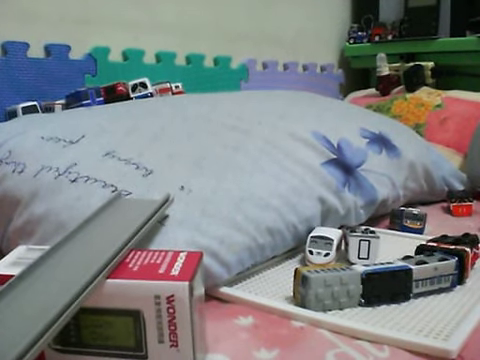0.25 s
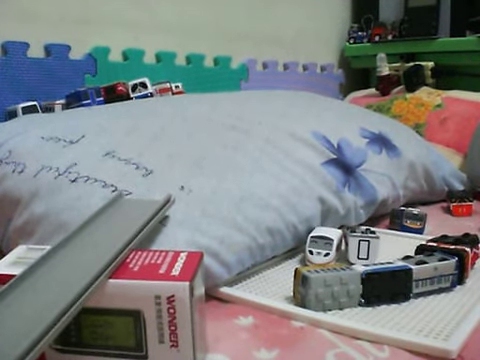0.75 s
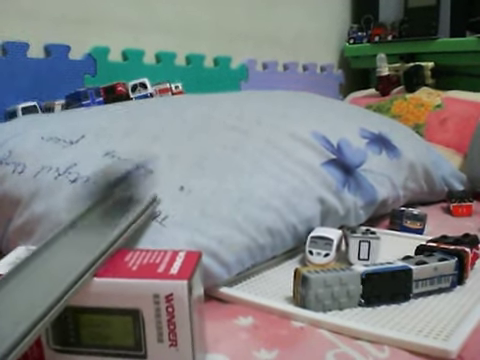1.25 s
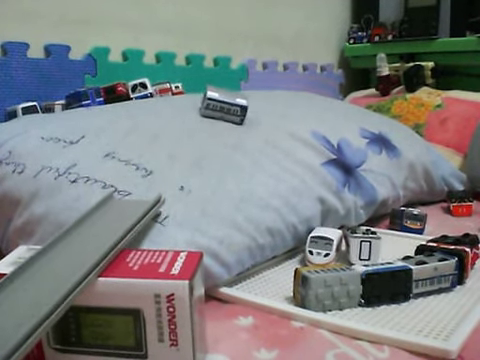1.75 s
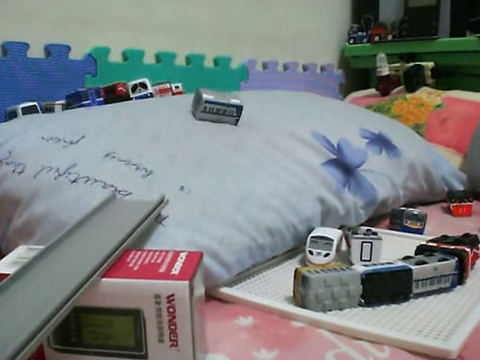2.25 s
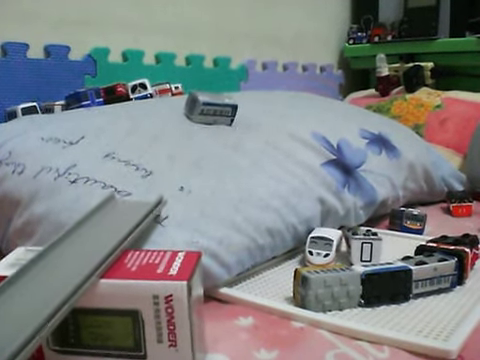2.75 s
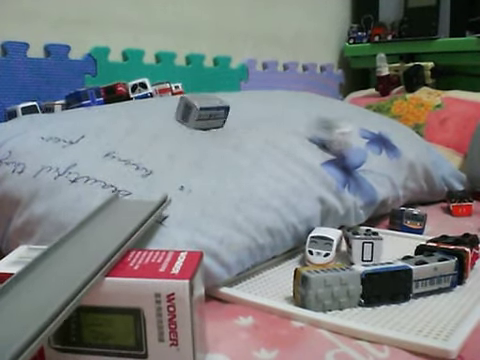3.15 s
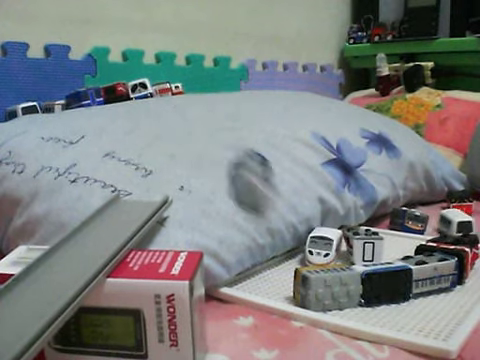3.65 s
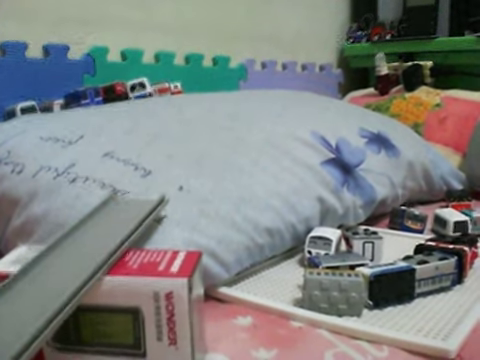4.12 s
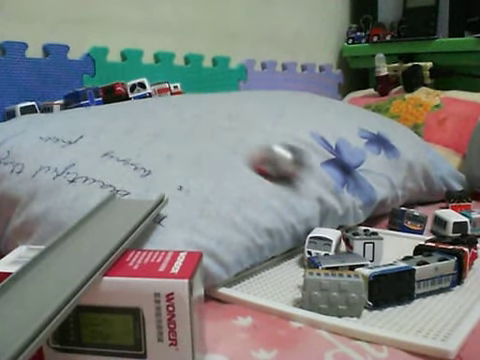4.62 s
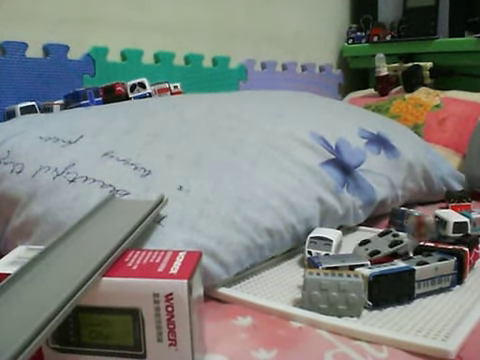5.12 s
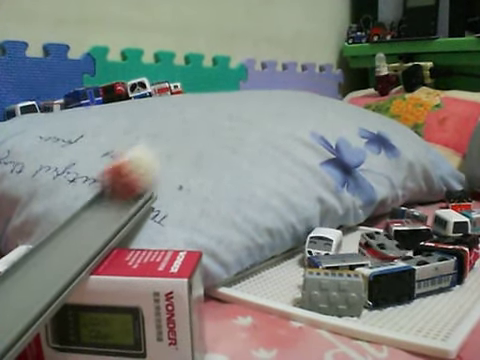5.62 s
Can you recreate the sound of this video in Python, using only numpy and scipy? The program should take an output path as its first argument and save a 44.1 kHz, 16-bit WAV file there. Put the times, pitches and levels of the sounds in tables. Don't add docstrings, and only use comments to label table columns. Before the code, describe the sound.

Plastic gears chatter close up: winding first, then a slower idle, then a freed car whirring and running down tick by tick. Hard clacks and soft thuds mark its fall. Two more cars race up the hollow ramp with quick whines, scuffs and dense steady buzzing, the second knocking into toys. Bedroom with faint fan drone and low rumble; short room tail, loudest clicks clipped on a cheap microphone.

```python
import sys
import numpy as np
from scipy import signal
from scipy.fft import rfft, irfft
from scipy.io import wavfile
from scipy.ndimage import uniform_filter1d, map_coordinates

SR = 44100
rng = np.random.default_rng(int(sys.argv[2]) if len(sys.argv) > 2 else 0)


def digitize_waveform(pressure):
    field = np.atleast_2d(pressure).T
    bounded = np.clip(field, -1, 1)
    quanta = np.round(bounded * 32767).astype(np.int16)
    wavfile.write(sys.argv[1], SR, quanta)


def how_loud(loudness_db):
    steps = np.asarray(loudness_db, float) / 20
    return 10 ** steps


N = 259308
TIME = np.arange(N) / SR


def level(x, db):
    return x * how_loud(db) / np.sqrt(np.mean(x ** 2))


def ring(x, hz, width_hz):
    return signal.lfilter(*signal.iirpeak(hz, hz / width_hz, fs=SR), x)


def body(x, modes):
    total = np.zeros(N)
    for k, (hz, width_hz, db) in enumerate(modes):
        total += (-1) ** k * how_loud(db) * ring(x, hz, width_hz)
    return level(total, 0)


def band(x, lo_hz, hi_hz):
    sos = signal.butter(2, [lo_hz, hi_hz], "band", fs=SR, output="sos")
    return level(signal.sosfilt(sos, x), 0)


def decay(t, t60):
    return np.exp(-np.log(1000) * t / t60)


def glide(rows):
    return np.interp(TIME, *np.array(rows)[:, :2].T)


def track(table, column, fade=.008):
    rows = np.array(table)
    s = np.r_[rows[0, 0] - fade, rows[:, 0], rows[-1, 0] + fade]
    return np.interp(TIME, s, np.r_[0, how_loud(rows[:, column]), 0])


def walk(rate):
    k = int(SR / rate)
    return 1.245 * uniform_filter1d(np.repeat(rng.standard_normal(N // k + 1), k)[:N], k)


def chatter(per_s, spread_db):
    hit = rng.random(N) < per_s / SR
    return hit * rng.standard_normal(N) * how_loud(spread_db * rng.exponential(size=N))


def airy(curve, start_db, db_per_s):
    return [(s, db, db + start_db + db_per_s * (s - curve[0][0])) for s, db in curve]


def gears(tables, shell, spin_hz, sag, tick_db, tick_ms, rough_db, treble_hz, treble_width_hz,
          turns=None, panels=()):
    if turns is None:
        turns = np.cumsum(spin_hz * (1 + 0.0143 * walk(40))) / SR
    else:
        turns = turns + 0.049 * walk(40)
    sizes = how_loud(tick_db + 1.3 * np.tanh(rng.standard_normal(2000)))
    size = sizes[(2 * turns).astype(int) % 2000]
    size = size * np.where(turns % 1 < .5, 1, .3)
    since_tick = (turns % .5) / spin_hz
    ticks = size * np.exp(-since_tick / (tick_ms / 1000))
    tight = 1 + uniform_filter1d(ticks, size=int(0.002 * SR))
    teeth = chatter(24000, .7) * tight * how_loud(rough_db * walk(110))

    place = np.cumsum(sag * (1 + .011 * walk(7)))
    at = np.arange(N)
    early = np.interp(np.interp(at, place, at), at, teeth)

    def sagged(v):
        return level(map_coordinates(v, [place], order=3, mode="mirror"), 0)

    low = sagged(body(early, shell))
    edge = level(ring(teeth, treble_hz, treble_width_hz), 0)
    high = level(edge + 1.07 * band(teeth, 6530, 9980), 0)
    out = sum(low * track(t, column=1) + high * track(t, column=2) for t in tables)
    loose = early * np.sign(rng.standard_normal(N))
    for hz, width_hz, curve in panels:
        out = out + sagged(ring(loose, hz, width_hz)) * track(curve, column=1)
    return out


def whines(tables, waver, waver_db):
    out = 0
    for rows in tables:
        phase = 2 * np.pi * np.cumsum(glide(rows) * (1 + waver * walk(300))) / SR
        tone = track(rows, column=2) * np.sin(phase) + track(rows, column=3) * np.sin(2 * phase)
        out = out + np.sqrt(2) * tone * how_loud(waver_db * walk(150))
    return out


# (f/Hz, level/dB per Hz)
ROOM = [(15, -44), (25, -2.5), (198, -3.5), (286, -5), (384, -4), (730, -4), (1030, -2.5), (1290, -0.5),
        (2000, -6.5), (2600, -47), (4400, -120)]
# (t/s, level/dB)
ROOM_SWELL = [(0.0, -41), (0.5, -44), (0.8, -49), (1.2, -42.5), (2.73, -46.5), (3.68, -50.5), (3.9, -52),
              (4.24, -36.5), (4.49, -43.5), (5.88, -41)]
# (t/s, level/dB)
FAN = [(0.0, -48.5), (2.73, -53.5), (4.1, -68), (4.5, -54), (5.88, -63)]


def room_tone():
    hz = np.maximum(np.arange(N // 2 + 1) * SR / N, 1)
    room_hz, room_db = np.array(ROOM).T
    shape = how_loud(np.interp(np.log(hz), np.log(room_hz), room_db))
    rumble = level(irfft(rfft(rng.standard_normal(N)) * shape, N), 2.56)
    drone = ring(ring(rng.standard_normal(N), 296, 30), 296, 30)
    return rumble * track(ROOM_SWELL, column=1) + level(drone, 0) * track(FAN, column=1)


# (t/s, level/dB)
WINDING = [(0.0, -22.5), (0.104, -21), (0.39, -20), (0.472, -21), (0.54, -25.5), (0.583, -27.5),
           (0.592, -40)]
# (f/Hz, width/Hz, level/dB)
WINDING_SHELL = [(1654, 160, -6), (2100, 600, -28), (2650, 180, -1), (3500, 370, -14), (3920, 360, 5.5),
                 (5130, 170, -16), (6240, 2800, -14), (3500, 3400, -4)]
# (t/s, pitch factor)
WINDING_SAG = [(0, .97), (.1, 1.0), (.2, .97), (.35, 1.02), (.6, 1.03)]
# (f/Hz, width/Hz, [(t/s, level/dB)])
WINDING_PANELS = [(1640, 90, [(0.0, -42), (0.12, -38), (0.25, -33), (0.38, -30), (0.45, -33), (0.55, -39)])]
# (t/s, length/s, dip/dB)
SLIPS = [
    (0.134, .045, -9.5),
    (0.397, 0.02, -13),
    (0.44, .018, -6),
]


def winding_car():
    dip_db = np.zeros(N)
    for s, length, db in SLIPS:
        dip_db += db * np.clip(1 - np.abs(TIME - s) / (length / 2), 0, 1) ** .5
    train = gears([airy(WINDING, start_db=-3.5, db_per_s=-11)], WINDING_SHELL, np.full(N, 64.0),
                  glide(WINDING_SAG), tick_db=0, tick_ms=0.47, rough_db=0.91,
                  treble_hz=10000, treble_width_hz=1800, panels=WINDING_PANELS)
    return how_loud(dip_db) * train


# (t/s, level/dB)
IDLER = [
    [(0.0, -39), (0.284, -29), (0.746, -34), (1.1, -32.5)],
    [(2.6, -45), (2.78, -28.5), (2.94, -28.5), (2.95, -36.5), (3.79, -35), (3.8, -31), (3.93, -31),
     (3.94, -34.5), (4.1, -32.5)],
]
# (f/Hz, width/Hz, level/dB)
IDLER_SHELL = [(1400, 210, 11), (2400, 360, 11.5), (3500, 920, 16.6), (5300, 300, 3.8), (6600, 120, 13.5),
               (3700, 6300, 8.1)]
# (f/Hz, width/Hz, [(t/s, level/dB)])
IDLER_PANELS = [(2545, 240, [(3.5, -50), (3.58, -40), (3.79, -46)])]


def idling_car():
    runs = [airy(run, start_db=0.26, db_per_s=0.14) for run in IDLER]
    return gears(runs, IDLER_SHELL, np.full(N, 22.0), np.ones(N), tick_db=0.66, tick_ms=2.0,
                 rough_db=1.73, treble_hz=8800, treble_width_hz=1600, panels=IDLER_PANELS)


# (t/s, tooth rate f/Hz, level/dB)
GROANS = [
    [(0, 1200, -38), (.05, 1120, -38), (.08, 980, -35), (.13, 850, -46)],
    [(.155, 850, -40), (.2, 920, -39), (.3, 1000, -38), (.38, 880, -41), (.43, 780, -43)],
]


def groans():
    slow = [[(s, hz, db, db + 4) for s, hz, db in rows] for rows in GROANS]
    return whines(slow, 0.085, 2.8)


# (t/s, peak level/dB)
CATCH = [(0.93, -9), (0.66, -9), (1.1, -2), (4.159, 0.5), (1.2135, -9), (1.1355, 1), (3.8, -2),
         (5.4535, -6), (4.2335, -9), (4.345, -1), (1.188, -12)]
COUPLING = [(0.84, -13), (1.26, 3.5), (1.1, -3), (2.8, -6), (5.513, -4), (5.537, -4), (5.5657, -4),
            (5.589, 4.5), (5.627, -7), (4.128, -14), (3, -20)]
AXLE = [(3.8526, -4), (3.8975, -2), (4.3444, -10), (4.3674, -6), (4.7554, 3.5), (5.1456, -3), (5.1574, -13),
        (5.4118, 1), (5.452, -1)]
ROOF = [(0.063, -6), (0.1967, -1.5), (0.419, -2), (0.4766, -1.5), (0.584, -5.5), (1.1835, -4),
        (3.4949, -21), (1.2984, -12), (3.3256, -19), (3.334, -7), (5.123, -7)]
FLOORPAN = [
    (3.8154, 4),
    (4.2678, 0),
    (4.7681, 1),
    (4.9586, 0),
]
# (ring f/Hz, length/ms, share of rattle after it, rise/ms)
PARTS = [
    (9410, 9.9, 0.12, 0.63),
    (6200, 13, 0.11, 3.5),
    (4500, 5.7, 0.09, 1.45),
    (3700, 9, 0.11, 1),
    (2680, 3, 0.22, 0.52),
    (3900, 4.53, 0.012, 0.9),
]
# (t/s, peak level/dB, ring f/Hz)
PAWL = [(5.252, 7, 6600), (5.273, 9.5, 6200), (5.2885, 6, 3920), (5.2987, 5, 5980), (5.3084, 3, 6860),
        (5.317, 3, 7540), (5.3249, 6, 3900), (5.333, 4, 4030), (5.3407, 5, 4700), (5.3536, 1, 3320)]
# (t/s, peak level/dB, ring f/Hz)
SNAPS = [(1.009, 4.5, 9100), (1.0534, 5.5, 9130), (1.1343, 6, 3900), (1.2072, 4, 9040), (1.357, -6, 9100),
         (1.369, -11, 9500), (1.394, -3, 2840), (4.9485, 1.5, 2710), (4.9487, 0, 8730), (5.5816, 8, 8500),
         (1.008, -4, 4400), (1.0535, -7, 4000), (2.931, 2, 3300), (4.0352, -1, 3420), (4.1357, 3, 2780),
         (4.098, -2, 2210), (4.7564, 0, 4810), (3.3152, 4, 2400), (3.4107, 5, 3100)]
# (t/s, peak level/dB, ring f/Hz, hollow level/dB)
RAMP_END = [(0.701, -20, 2470, -26), (1.0988, -14, 2440, -23), (1.1113, -1, 5300, -8),
            (1.1942, -9, 3560, -14.5), (2.26, -14, 3900, -18), (2.393, -10.5, 3310, -26),
            (3.8012, -3.5, 3430, -16.5), (4.138, -1, 2650, -15), (4.089, -14, 2240, -14),
            (5.1157, -10, 2680, -21)]
RAMP_MIDDLE = [(0.787, -17, 6200, -27), (1.085, -20, 8600, -16), (1.27, -22, 5540, -14),
               (2.2813, -20, 3500, -22), (2.915, -6, 3700, -14), (2.931, -2.5, 5460, -12.5),
               (3.3159, 10, 5530, -17.5), (3.4109, 6.5, 3050, -46), (3.8645, -14, 4930, -15),
               (3.8666, -1, 4850, -7), (4.0953, -12, 6800, -10), (4.1093, -1, 2100, -7.5)]
CARTON = [(0.4584, -14, 3840, -12.5), (2.632, -9.5, 3450, -21), (2.7869, -1, 7820, -13.5),
          (2.796, 1.5, 3450, -11), (3.874, -1, 6600, -19), (4.2152, -9, 2500, -17.5)]
TRAY = [(1.1226, -8, 3800, -11), (4.1162, -24, 4050, -9), (0.459, -19, 3800, -18), (4.294, 3, 9800, -11),
        (5.516, -6, 8960, -18.5), (5.534, -7, 5740, -22), (5.5644, -6, 5000, -19)]
HOLLOWS_HZ = [1426, 1213, 990, 424]


def blows():
    rows = []
    for ticks, (hz, ms, rattle, rise) in zip((CATCH, COUPLING, AXLE, ROOF, FLOORPAN), PARTS):
        for s, db in ticks:
            scattered_hz = hz * (1 + 0.0473 * rng.standard_normal())
            rows.append((s, db, scattered_hz, ms, hz, -99, rattle, rise))
    _, ms, rattle, rise = PARTS[-1]
    for s, db, hz in PAWL + SNAPS:
        rows.append((s, db, hz, ms, hz, -99, rattle, rise))
    for knocks, hollow_hz in zip((RAMP_END, RAMP_MIDDLE, CARTON, TRAY), HOLLOWS_HZ):
        for s, db, hz, hollow_db in knocks:
            ms = 6.4 * how_loud(-0.89 * max(db, -6))
            rows.append((s, db, hz, ms, hollow_hz, hollow_db, 0.19, 0.34))
    return rows


def clacks():
    out, t = np.zeros(N + 2048), np.arange(2048) / SR
    onset = np.minimum(t / 0.0001, 1)
    for s, db, hz, ms, hollow_hz, hollow_db, rattle, rise in blows():
        hiss = rng.standard_normal(2048)
        low_share = 0.6 if hz > 8400 else 0.24
        fall = np.exp(-np.log(1000) * (t / (ms / 1000)) ** 1.28) + rattle * decay(t, 0.082) * onset
        crack = band(hiss, max(low_share * hz, 1080), 10700) * fall
        shell = np.sin(2 * np.pi * hz * t + 0.79 * band(hiss, 190, 890))
        shell = shell * decay(t, 3.32 * ms / 1000) * onset
        note = np.sin(2 * np.pi * hollow_hz * t) * decay(t, 0.029) * onset
        thump = 0.45 * band(hiss, 375, 2030) * decay(t, 0.064) * onset
        hollow = (note + thump) * np.minimum(t / 0.00081, 1)
        hard = np.minimum(t / (rise / 1000), 1) ** 2 * (0.7 * crack / np.abs(crack).max() + 0.28 * shell)
        i = int(s * SR)
        out[i:i + 2048] += how_loud(db) * hard + how_loud(hollow_db) * hollow
    return out[:N]


# (t/s, peak level/dB, f/Hz)
THUDS = [(0.455, -42, 303), (1.124, -20, 260), (2.795, -55, 294), (3.315, -23, 265), (3.318, -32, 119),
         (0.737, -33, 304), (3.801, -14, 147), (3.857, -28, 174), (3.891, -42, 102), (3.8745, -14, 790),
         (4.034, -31.5, 243), (4.119, -35, 173), (4.528, -38, 296), (4.753, -28, 96), (4.983, -22.5, 275),
         (5.116, -26, 257.4), (5.131, -25, 101), (5.299, -23, 322)]


def thuds():
    out, t = np.zeros(N + 8192), np.arange(8192) / SR
    for s, db, hz in THUDS:
        ms = 17 * how_loud(-0.75 * (db + 35.0))
        i = int(s * SR)
        out[i:i + 8192] += how_loud(db) * np.sin(2 * np.pi * hz * t) * np.exp(-t / (ms / 1000)) * (1 - t / t[-1])
    return out[:N]


# (t/s, level/dB)
BED = [
    [(0.66, -62), (0.72, -55), (1.25, -49), (1.35, -70)],
    [(3.31, -42.5), (3.42, -54), (3.56, -68)],
    [(3.8, -39), (3.9, -42), (3.98, -62), (4.04, -44), (4.2, -48)],
]


def bed_frame():
    rumble = level(ring(ring(rng.standard_normal(N), 115, 75), 115, 75), 0)
    return rumble * sum(track(t, column=1) for t in BED)


# (start t/s, loudest t/s, end t/s, level/dB, low boom against it level/dB)
ROLLS = [
    (0.987, 1.1, 1.17, -21.5, -15),
    (1.149, 1.21, 1.34, -29, -10),
    (2.63, 2.702, 2.82, -26.5, -13.5),
    (3.798, 3.875, 3.97, -35.5, -7),
    (4.015, 4.082, 4.2, -22, -9.5),
    (4.15, 4.24, 4.36, -31, -14),
    (5.21, 5.286, 5.43, -29.5, -5.5),
    (5.39, 5.516, 5.8, -33.5, -4),
]
# (f/Hz, width/Hz, level/dB)
RAMP = [(830, 480, -4.5), (1060, 370, 0), (1297, 245, -1.5), (1412, 56, -2), (1840, 1250, -15)]
# (f/Hz, width/Hz, level/dB)
RAMP_BOOM = [(335, 200, 2.5), (399, 46, 11), (607, 99, -9.5)]


def ramp():
    bumps = chatter(3000, 1.3) * how_loud(1.2 * walk(80))
    hollow, boom = body(bumps, RAMP), body(bumps, RAMP_BOOM)
    out = np.zeros(N)
    for start, top, end, db, boom_db in ROLLS:
        out += np.interp(TIME, [start, top, end], [0, how_loud(db), 0]) * (hollow + how_loud(boom_db) * boom)
    return out


# (t/s, level/dB)
FIRST = [(1.0, -40), (1.15, -26.5), (1.25, -28.5), (1.38, -29), (1.6, -29), (2.62, -30.5), (2.76, -33),
         (3.31, -35.5), (3.325, -32), (3.42, -40), (3.6, -54)]
# (f/Hz, width/Hz, level/dB)
FIRST_SHELL = [(1535, 58, -5), (2405, 580, -4.5), (3230, 550, -3.5), (3370, 490, -5.5), (3680, 94, -5.5),
               (5600, 1200, -7.5), (2470, 5100, -19)]
# (t/s, pitch factor)
FIRST_SAG = [(1.0, .985), (1.4, .99), (1.7, 1.0), (3.8, 1.0)]
# (t/s, whole turns of the tight gear done)
FIRST_TURNS = [(1.0, 0), (1.3565, 30), (1.5068, 42), (1.664, 54), (1.837, 66), (2.026, 78), (2.2395, 90),
               (2.487, 102), (2.7535, 113), (3.021, 122), (3.276, 129), (3.62, 136)]
# (f/Hz, width/Hz, [(t/s, level/dB)])
FIRST_PANELS = [(3657, 58, [(1.0, -38), (1.2, -30.5), (1.35, -55), (1.55, -35.5), (2.4, -33.5),
                (2.9, -39.5), (3.4, -46)]), (3410, 176, [(1.0, -42), (1.3, -32.5), (1.48, -28),
                (1.7, -27.5), (2.62, -30.5), (2.79, -35), (2.95, -34.5), (3.31, -33), (3.56, -41)]),
                (1560, 52, [(3.1, -54), (3.24, -41), (3.4, -37), (3.56, -54)])]


def first_car():
    s, done = np.array(FIRST_TURNS).T
    turns = np.polyval(np.polyfit(s - 2, done, 6), np.clip(TIME, s[0], s[-1]) - 2)
    spin_hz = np.maximum(np.gradient(turns) * SR, 15)
    return gears([airy(FIRST, start_db=3.34, db_per_s=-3)], FIRST_SHELL, spin_hz, glide(FIRST_SAG),
                 tick_db=10, tick_ms=1.7, rough_db=.6, treble_hz=9260, treble_width_hz=820,
                 turns=turns, panels=FIRST_PANELS)


# (t/s, tooth rate f/Hz, level/dB, octave level/dB)
LAUNCHES = [
    [(4.058, 2120, -40, -28), (4.07, 2550, -29, -28), (4.09, 3300, -31, -32), (4.105, 3750, -31, -29),
     (4.12, 3950, -30, -29), (4.132, 4080, -31, -30)],
    [(5.268, 1600, -46, -30), (5.29, 2500, -40, -27), (5.31, 3400, -30, -25), (5.33, 4050, -26, -20),
     (5.342, 4300, -22, -22), (5.351, 4420, -21, -24)],
]
# (t/s, length/s, first f/Hz, last f/Hz, level/dB, swell/dB)
SKIDS = [
    (1.05, .035, 3500, 4000, -30, 0),
    (5.41, .025, 5000, 4200, -32, 0),
    (4.053, .012, 3350, 3450, -29, 0),
    (5.435, .08, 4200, 6000, -34, 0),
]
# (t/s, length/s, first f/Hz, last f/Hz, level/dB, swell/dB)
COASTS = [
    (4.3, .4, 385, 330, -47, -12),
    (1.8, .4, 205, 165, -58, 0),
]


def sweeps(rows, bend, octave_db):
    u = np.linspace(0, 1, 9)
    tables = []
    for s, length, first_hz, last_hz, db, swell_db in rows:
        hz = last_hz + (first_hz - last_hz) * (1 - u) ** bend
        swell = swell_db * (u - .5)
        tables.append(np.c_[s + u * length, hz, db + swell, db + octave_db + .35 * swell])
    return tables


def pinions():
    fast = LAUNCHES + sweeps(SKIDS, bend=1.7, octave_db=-22)
    slow = sweeps(COASTS, bend=2.44, octave_db=-9)
    return whines(fast, .009, 2.7) + whines(slow, .05, 4.0)


# (middle t/s, length/ms, level/dB, colour f/Hz)
SCUFFS = [(1.113, 36, -20, 5300), (1.265, 21, -19, 5400), (1.275, 11, -16, 6000), (3.805, 8.7, -16.5, 3500),
          (3.818, 14, -23, 2300), (3.8542, 10, -26, 1900), (4.13, 10, -18, 6500), (1.298, 15, -19.5, 6300),
          (2.728, 25, -25.5, 4500), (4.27, 12, -15, 7000), (4.762, 20, -21, 4300), (5.124, 13, -21, 5000),
          (5.412, 7.7, -19, 5000), (5.567, 8, -16, 6300), (5.455, 14, -20, 6500), (5.509, 20, -13.5, 6000),
          (5.539, 10, -16, 5600), (5.589, 13, -16, 7900), (5.625, 21, -16, 6600)]


def scuffs():
    out, t = np.zeros(N), np.arange(-1024, 1024) / SR
    for s, ms, db, hz in SCUFFS:
        i = int(s * SR)
        swell = np.cos(np.pi * np.clip(t / (ms / 1000), -.5, .5)) ** 2
        rub = band(rng.standard_normal(2048), hz / 1.26, hz * 1.26)
        out[i - 1024:i + 1024] += how_loud(db) * swell * rub
    return out


# (t/s, level/dB)
SECOND = [(4.035, -30.5), (4.125, -24.5), (4.151, -21), (4.25, -20), (4.368, -20), (4.385, -24),
          (4.78, -21.5)]
LANDED = [
    (4.79, -26),
    (5.1, -26),
    (5.12, -28),
    (5.3, -29.5),
]
FREED = [
    (5.115, -24),
    (5.2, -27.5),
    (5.26, -28),
]
# (f/Hz, width/Hz, level/dB)
SECOND_SHELL = [(1100, 97, -15), (1434, 78, 0.5), (1790, 2370, -4.5), (2680, 360, 4), (4120, 540, -0.5),
                (4830, 230, 3.5), (6430, 1340, 0.5), (4070, 7000, -10.5)]
LANDED_SHELL = [(1170, 770, -6.5), (2100, 530, -7), (2680, 220, 4), (3450, 630, -5.5), (3900, 350, -1.5),
                (4820, 520, -0.5), (6470, 850, -3.5)]
FREED_SHELL = [(2760, 140, 1.5), (4130, 150, 2), (5090, 140, 2.5), (6040, 500, -11), (4000, 4100, -22)]
# (t/s, turns a second/Hz)
SECOND_SPIN = [(4.0, 105), (4.8, 118.2), (5.3, 125.2)]
# (t/s, pitch factor)
SECOND_SAG = [(4.0, .96), (4.3, .965), (4.6, 1.0), (4.8, 1.0)]
# (f/Hz, width/Hz, [(t/s, level/dB)])
SECOND_PANELS = [(4100, 200, [(4.12, -38), (4.25, -33), (4.37, -28), (4.42, -39)]),
                 (2620, 300, [(4.13, -30), (4.24, -26), (4.37, -37), (4.45, -38)])]


def second_car():
    spin_hz, even = glide(SECOND_SPIN), np.ones(N)
    racing = gears([airy(SECOND, start_db=0.74, db_per_s=-2.8)], SECOND_SHELL, spin_hz, glide(SECOND_SAG),
                   tick_db=1.0, tick_ms=0.65, rough_db=0.95, treble_hz=9770, treble_width_hz=1600,
                   panels=SECOND_PANELS)
    lying = gears([airy(LANDED, start_db=0.84, db_per_s=-2.1)], LANDED_SHELL, spin_hz, even,
                  tick_db=3.6, tick_ms=1.9, rough_db=1.0, treble_hz=9660, treble_width_hz=1200)
    freed = gears([airy(FREED, start_db=-3.5, db_per_s=-1.5)], FREED_SHELL, spin_hz, even,
                  tick_db=2.5, tick_ms=1.2, rough_db=1.2, treble_hz=9300, treble_width_hz=900)
    return racing + lying + freed


# (t/s, level/dB)
THIRD = [
    (5.25, -31.5),
    (5.458, -20),
    (5.588, -23),
    (5.88, -22.5),
]
# (f/Hz, width/Hz, level/dB)
THIRD_SHELL = [(2860, 560, -1.0), (3930, 230, 7.0), (4750, 260, 3.0), (5780, 1530, 6.0), (4240, 2740, 1.5)]


def third_car():
    return gears([airy(THIRD, start_db=0.21, db_per_s=-1.5)], THIRD_SHELL, np.full(N, 122.0), np.ones(N),
                 tick_db=1.2, tick_ms=2.2, rough_db=0.7, treble_hz=7330, treble_width_hz=800)


def scene():
    trains = winding_car() + idling_car() + first_car() + second_car() + third_car()
    toys = trains + groans() + pinions() + clacks() + thuds() + ramp() + scuffs()
    t = np.arange(SR // 3) / SR
    tail = band(rng.standard_normal(len(t)), 570, 6500) * decay(t, 0.34) * (t > .004)
    tail = tail / np.sqrt(np.sum(tail ** 2))
    walls = how_loud(-16) * signal.fftconvolve(toys, tail)[:N]
    return (toys + walls + room_tone() + bed_frame())[None]


def top_cut(x):
    return signal.sosfilt(signal.butter(12, 15830, fs=SR, output="sos"), x)


def record(dry):
    x = dry - 0.87 * ring(dry, 7265, 540)
    x = signal.sosfilt(signal.butter(12, 11000, fs=SR, output="sos"), x)
    x = signal.sosfilt(signal.butter(1, 45, "high", fs=SR, output="sos"), x)
    saturates, knee = .66, 8
    x = x / (1 + np.abs(x / saturates) ** knee) ** (1 / knee)
    x = signal.sosfilt(signal.ellip(14, .3, 90, 12360, fs=SR, output="sos"), x)
    return top_cut(np.clip(x, -.71, .71))


dry = scene()
out = record(dry)
digitize_waveform(out)
```